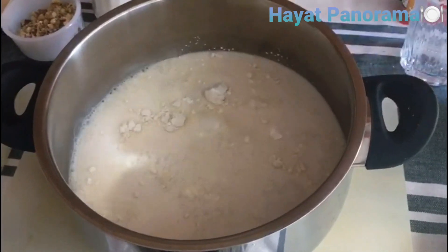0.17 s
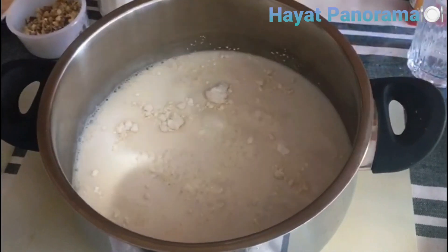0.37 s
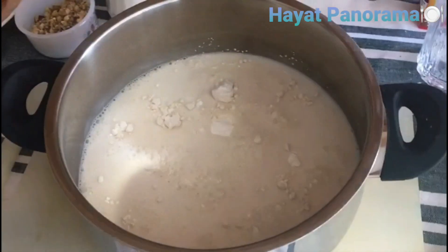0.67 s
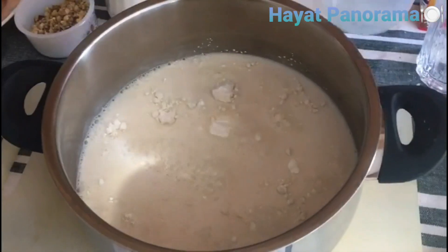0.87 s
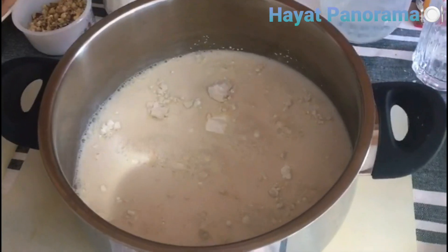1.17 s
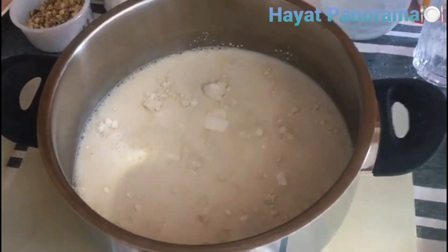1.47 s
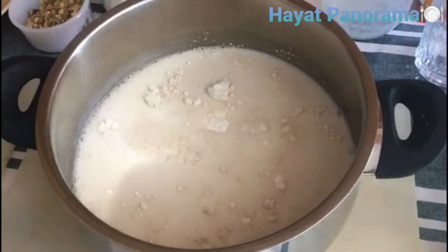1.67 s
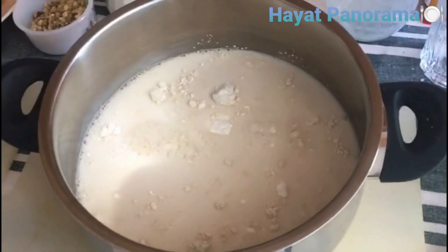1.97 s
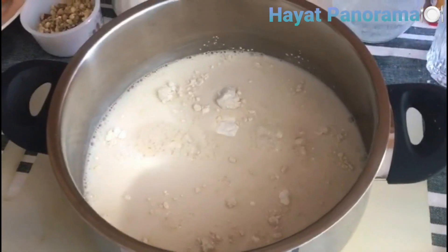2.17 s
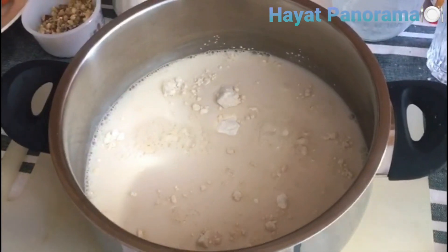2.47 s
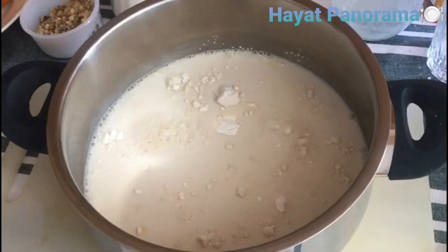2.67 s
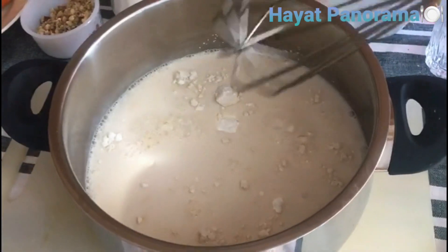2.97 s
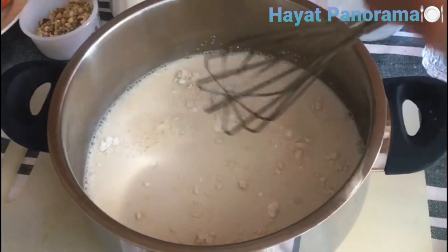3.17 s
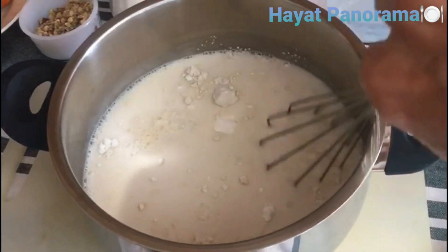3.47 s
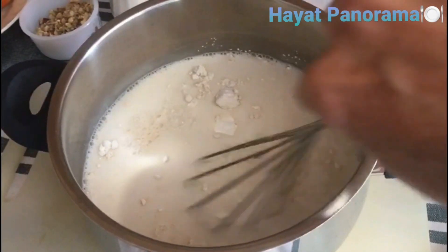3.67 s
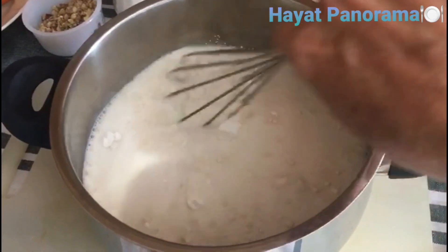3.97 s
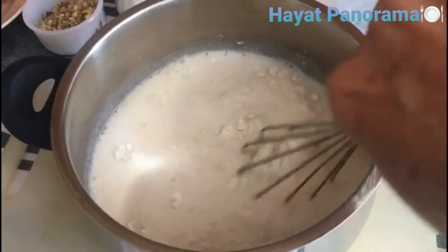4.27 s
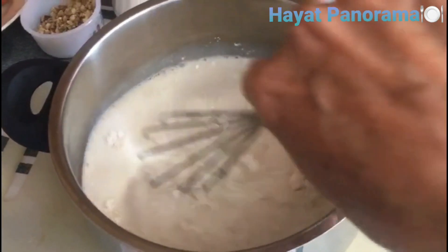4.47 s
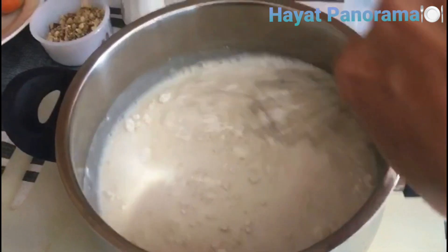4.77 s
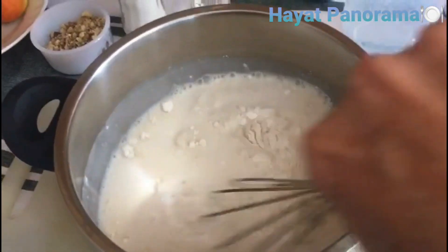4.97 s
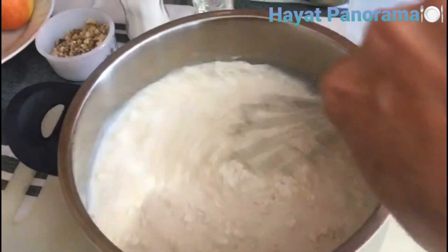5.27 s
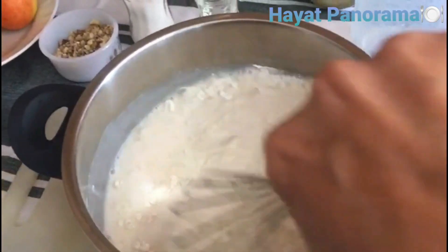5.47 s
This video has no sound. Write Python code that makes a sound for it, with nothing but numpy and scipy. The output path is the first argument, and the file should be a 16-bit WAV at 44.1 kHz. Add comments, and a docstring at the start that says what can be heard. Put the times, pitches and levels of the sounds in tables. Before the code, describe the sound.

A heavy clunk on a table, a metal whisk clattering as it is lifted, bird whistles, then wires scraping and pinging in a steel pot of milk.

```python
"""A wire whisk works in a steel pot of milk on a kitchen table, close to the microphones.
Its wires ping the pot wall, then stick and slip over the steel: random contacts drive resonances, and milk churns.
Before that something is set down with a clunk that rings the table, and the whisk is picked up with a clatter.
A bird sings gliding whistles and chips, blurred by scattering; room air, foam fizz and a low mains hum lie under all.
"""
import sys
import numpy as np
from scipy import signal
from scipy.fft import rfft, irfft
from scipy.io import wavfile
from scipy.ndimage import map_coordinates

SR = 44100
rng = np.random.default_rng(int(sys.argv[2]) if len(sys.argv) > 2 else 0)


def waveform_to_disk(signal):
    """Save audio, clipped to [-1, 1], as 16-bit WAV at the path in sys.argv[1]."""
    frames = np.transpose(np.atleast_2d(signal))
    scaled = np.clip(frames, -1, 1) * 32767
    samples = np.round(scaled).astype(np.int16)
    wavfile.write(sys.argv[1], SR, samples)


N = 247842

# colour of the moving milk and of its bubbles [f/Hz, relative level/dB per Hz]
MILK_COLOUR = [(120, -12), (180, 2), (300, -13), (450, -12), (700, 2), (950, -3.5), (1600, -4.5),
               (3000, -21.5)]


def gain_of(db):
    """Decibels to amplitude."""
    return 10 ** (np.asarray(db) / 20)


def evened(x):
    """Scales to rms 1."""
    return x / np.sqrt(np.mean(x ** 2) + 1e-20)


def unit(x):
    """Scales to energy 1."""
    return x / np.linalg.norm(x)


def read(points, hz):
    """Reads a spectrum on a log-frequency axis."""
    f, value = np.transpose(points)
    return np.interp(np.log(hz + 1), np.log(f + 1), value)


def add(mix, s, sound):
    """Mixes a sound in at time s."""
    part = mix[round(s * SR):][:len(sound)]
    part += sound[:len(part)]


def through(x, response):
    """Passes x through an impulse response."""
    return signal.oaconvolve(x, response)[:len(x)]


def colour(points, size=4096):
    """Causal (minimum-phase) impulse response of energy 1 with the given spectrum."""
    hz = abs(np.fft.fftfreq(size, 1 / SR))
    log_gain = np.log(gain_of(read(points, hz)))
    response = np.fft.ifft(np.exp(np.conj(signal.hilbert(log_gain)))).real
    return unit(response[:size // 2])


def ring(modes):
    """Dying sines of a struck body; neighbouring modes start in opposite directions."""
    t = np.arange(SR) / SR
    out = np.zeros(SR)
    for k, (hz, db, t60) in enumerate(modes):
        out += (-1) ** k * gain_of(db - 60 * t / t60) * np.sin(2 * np.pi * hz * t)
    return out


def body_of(spectrum, modes, ring_db):
    """Response of a struck thing: a broad colour and its ringing modes, ring_db louder than the colour."""
    out = gain_of(ring_db) * unit(ring(modes))
    add(out, 0, colour(spectrum))
    return unit(out)


def flutter(rate_hz, size=4096):
    """Smooth random motion of rms 1, mostly slower than rate_hz."""
    hz = np.fft.rfftfreq(size, N / SR / size)
    slow = irfft(rfft(rng.standard_normal(size)) / (1 + (hz / rate_hz) ** 4))
    return np.interp(np.linspace(0, size - 1, N), np.arange(size), evened(slow))


def slips(per_s, spread_db):
    """Random tiny contacts of uneven size and random direction."""
    out = np.zeros(N)
    at = np.flatnonzero(rng.random(N) < per_s / SR)
    size = np.minimum(rng.exponential(1, N)[at], 4)
    sign = rng.integers(0, 2, N)[at] * 2 - 1
    out[at] = sign * gain_of(spread_db * size)
    return evened(out)


def blows(rows, chatter, spread_db=2.5):
    """Each blow is one sharp contact and a dying chatter of smaller, uneven ones."""
    out = np.zeros(N)
    t = np.arange(SR // 3) / SR
    grains = slips(9000, spread_db)
    for s, db, t60 in rows:
        fade = gain_of(-60 * t / t60)
        rattling = unit(fade * np.roll(grains, -round(s * SR))[:len(t)])
        force = chatter * rattling + (t == 0)
        add(out, s, gain_of(db) * np.linalg.norm(fade) * unit(force))
    return out


def resonate(x, hz, width):
    """A steep resonance whose pitch follows the curve hz."""
    angle = (2 * np.pi * (np.cumsum(hz / SR) % 1)).astype(np.float32)
    turn = np.array([np.cos(angle), np.sin(angle)])
    r = np.exp(-np.pi * width / SR)
    # shift the pitch down to zero, smooth twice, shift back up
    smooth = signal.lfilter([1], [1, -2 * r, r * r], x * turn + 1e-18)
    return evened((turn * smooth).sum(0))


def kitchen(x, wet_db, side=0.038):
    """Sparse reflections die band by band; the two close microphones hear nearly the same."""
    # reverberation of the kitchen [f/Hz, t60/s]
    decay = [(150, 0.5), (600, 0.51), (2000, 0.52), (6000, 0.33), (12000, 0.4)]
    taps = rng.choice([-1., 1.], (2, SR // 3)) * (rng.random((2, SR // 3)) < 3000 / SR)
    taps[:, :SR // 250] = 0  # nothing returns in the first 4 ms
    hz, t, z = signal.stft(taps, SR, nperseg=256)
    fade = gain_of(-60 * t / read(decay, hz)[:, None])
    tails = signal.istft(z * fade, SR, nperseg=256)[1]
    mid, wide = (gain_of(wet_db) * through(x, unit(tail)) for tail in tails)
    return np.array([x + mid + side * wide, x + mid - side * wide])


def background():
    """Still room air as shaped noise, a hum of sines wavering in phase, and fizzing foam."""
    # room air [f/Hz, relative level/dB per Hz]
    air_colour = [(15, -32), (25, -8.5), (74, -0.5), (104, -3.5), (124, -1), (197, -8), (269, -9),
                  (298, -6.5), (331, -13.5), (386, -12.5), (418, -20), (615, -19.5), (817, -23),
                  (1300, -25.5), (12000, -36.5), (15600, -71), (22000, -120)]
    # appliance hum [f/Hz, rms level/dB]
    hum_tones = [(49, -58), (100, -58), (199.5, -64.5), (299.5, -61), (389, -72.5)]
    t = np.arange(N) / SR
    spectrum = gain_of(read(air_colour, np.fft.rfftfreq(N, 1 / SR)))
    air = evened(irfft(rfft(rng.standard_normal(N)) * spectrum, N))
    hum = np.zeros(N)
    for hz, db in hum_tones:
        hum += gain_of(db) * np.sqrt(2) * np.sin(2 * np.pi * hz * t + 0.48 * flutter(2.1))
    # foam popping on the milk
    fizz = sum(resonate(slips(45, 2.56), np.full(N, hz), 2600) for hz in (2990, 6140, 7570, 10200))
    return gain_of(-55.5) * air + hum + gain_of(-79) * kitchen(fizz, wet_db=-0.5)


def clunk():
    """A soft heavy blow rings the modes of the table, with a dull thud of two contacts."""
    # the table under a set-down load [f/Hz, relative level/dB, t60/s]
    table_modes = [(96.4, -29.5, 0.2), (142, -30, 0.048), (220, -17.5, 0.6), (258, -20, 0.063),
                   (296, -33.5, 0.26), (381.5, -27, .1), (426.4, -28, 0.2), (462, -27, 0.16),
                   (470, -18.5, 0.023), (689, -33, 0.17), (636, -32, 0.11), (726, -38, 0.19),
                   (1018, -25.5, 0.2), (1110, -40, .15), (1380, -48, .1), (2665, -45.5, 0.11)]
    # the thud of the load [f/Hz, relative level/dB per Hz]
    thud_colour = [(35, -34), (60, -10), (149, -11.5), (227, -12), (284, -4), (500, -10), (640, -8.5),
                   (945, -17), (1040, -18), (1160, -16), (5000, -65.5), (6500, -94), (11000, -120)]
    clunk_s = 1.178
    ringing = np.zeros(N)
    soft_ring = through(ring(table_modes), signal.windows.hann(9) / 4)  # a soft contact dulls the ring
    add(ringing, clunk_s, gain_of(-2.0) * soft_ring)
    contacts = [(clunk_s, -23, .02), (clunk_s + 0.0036, -30, .13)]  # t/s, level/dB, t60/s
    thud = through(blows(contacts, chatter=3.6), colour(thud_colour))
    return kitchen(ringing, wet_db=-28) + kitchen(thud, wet_db=-7.0)


def note(length, db, first_hz, middle_hz, last_hz, rasp):
    """One note whose pitch follows a parabola; rasp makes its level pulse and its pitch wobble."""
    rasp_hz, rasp_bend = 170.5, 0.092  # bend as a share of the pitch, at full rasp
    u = np.linspace(0, 1, round(length * SR))
    bow = (middle_hz - (first_hz + last_hz) / 2) * (1 - (2 * u - 1) ** 2)
    hz = first_hz + (last_hz - first_hz) * u + bow
    pulse = rasp * np.sin(2 * np.pi * rasp_hz * length * u)
    tone = (1 + pulse) * np.sin(2 * np.pi * np.cumsum(hz * (1 + rasp_bend * pulse)) / SR)
    taper = signal.windows.tukey(len(u), 0.34)  # share of the note spent swelling and fading
    return gain_of(db) * taper * evened(tone)


def bird():
    """Gliding whistles and chips, blurred by scattering from nearby walls."""
    # notes bending through three pitches; t counts from each entry of the phrase
    # [t/s, length/s, level/dB, first f/Hz, middle f/Hz, last f/Hz, rasp 0-1]
    opening = [(1.46, .06, -75, 4250, 4100, 3750, 0), (1.585, .125, -75, 3280, 3790, 3300, 0),
               (1.73, 0.12, -74, 3350, 3790, 3400, 0), (1.997, .025, -64, 3400, 2780, 2450, 0),
               (2.003, 0.022, -63.5, 5800, 5100, 4700, 0), (2.02, .07, -75, 3200, 3550, 3900, 0),
               (2.145, .035, -61, 2120, 2800, 3820, 0.7), (2.192, 0.034, -60.5, 2200, 2950, 4150, .8),
               (2.242, 0.042, -59, 2150, 3000, 4060, .8), (2.33, 0.043, -37.5, 2910, 2820, 2920, .2),
               (2.372, .22, -42.5, 2985, 3443, 2807, 0.01), (2.77, 0.022, -46, 5000, 5730, 6900, 0.04),
               (2.782, 0.027, -45.5, 3960, 4740, 4800, 0.14), (2.811, 0.02, -42, 7650, 5300, 3970, 0.07)]
    slur = [(0, .02, -51.5, 2035, 1996, 2000, 0.8), (.015, 0.0403, -43.5, 1980, 2060, 2340, .05),
            (.046, .029, -45.5, 2330, 2280, 1520, .05)]  # a raspy low slur, sung twice
    chips = [(0, 0.0216, -42, 3070, 4284, 4220, 0.06), (.027, 0.0228, -41, 3475, 4087, 4250, 0.2),
             (.056, .024, -42, 3470, 4050, 4200, .15)]  # three quick chips that answer each slur
    flick = [(0, .014, -45, 3660, 2467, 1920, .1), (.019, .036, -43, 1945, 2600, 2490, 0.03)]  # a closing down-up flick, sung twice
    # when each phrase enters [t/s]
    slur_entries = [2.878, 3.156]
    chip_entries = [3.011, 3.28]
    flick_entries = [3.424, 3.509]
    song = np.zeros(N)
    phrases = ((opening, [0]), (slur, slur_entries), (chips, chip_entries), (flick, flick_entries))
    for notes, entries in phrases:
        for entry in entries:
            for s, *shape in notes:
                add(song, entry + s, note(*shape))
    t = np.arange(SR // 5) / SR
    # the scatter swells and dies within a few tens of ms
    scatter = unit(rng.standard_normal(len(t)) * t * np.exp(-t / 0.0082))
    blurred = song + gain_of(-6) * through(song, scatter)
    return kitchen(blurred, wet_db=-15.5, side=0.38) * gain_of([[-.3], [.3]])  # slightly to the right


def clatter():
    """The whisk drags and jolts as it is lifted, and its wires ring."""
    # jolts of the whisk being picked up [t/s, level/dB, t60/s]
    jolts = [(1.823, -50.5, 0.053), (2.293, -32, 0.041), (2.3, -32, 0.28), (2.334, -35, 0.081),
             (2.346, -35.5, 0.055), (2.366, -34.5, 0.14), (2.39, -36.5, 0.11), (2.402, -42, 0.027)]
    # colour of the whisk [f/Hz, relative level/dB per Hz]
    whisk_colour = [(150, -1.5), (260, 0), (540, 2.5), (800, -7), (1150, 3.5), (1600, -3), (2400, -6),
                    (2900, 2.5), (3600, -9.5), (4200, -3), (4900, -14.5), (5700, -2.5), (6500, -16),
                    (9500, -6.5), (12000, -13)]
    # its loose wires [f/Hz, relative level/dB, t60/s]
    loose_wires = [(470, -26, .12), (544, -2, 0.12), (1068, 1.5, 0.076), (1180, -18, 0.082),
                   (2256, -4, 0.25), (2950, -3, 0.18), (3250, -19, .1), (4190, -4, 0.15),
                   (5630, -16, 0.085), (5770, 0, 0.087), (7870, -4, 0.08), (9600, -13, 0.06)]
    body = body_of(whisk_colour, loose_wires, ring_db=-9)
    return kitchen(through(blows(jolts, chatter=17), body), wet_db=-10.0)


def knocks():
    """Blunt bumps of cookware that ring the base of the pot."""
    # dull knocks [t/s, level/dB, t60/s]
    bumps = [(2.084, -41.5, 0.08), (3.54, -40, 0.024), (3.595, -53, 0.06), (3.888, -46.5, 0.25),
             (4.816, -36, 0.15), (4.828, -40, 0.037), (5.032, -48, .06), (5.16, -47, 0.051)]
    # their colour [f/Hz, relative level/dB per Hz]
    bump_colour = [(90, -23), (200, 4), (450, 3.5), (800, -10), (1250, -3), (1900, -14.5), (3000, -14),
                   (3700, -4), (5000, -16), (12000, -29.5)]
    # modes of the pot's base [f/Hz, relative level/dB, t60/s]
    base_modes = [(350.7, 2, 0.37), (417, -0.5, 0.15), (654, 1, 0.17), (937, 3, 0.081), (1230, -6, 0.3),
                  (2190, -2.5, 0.094), (3500, 8.5, 0.013)]
    body = body_of(bump_colour, base_modes, ring_db=0.5)
    return kitchen(through(blows(bumps, chatter=11.0), body), wet_db=-12)


def ticks():
    """Each strike pings the wall, which the milk damps quickly; then the wires rattle against each other."""
    # wires striking the pot wall [t/s, strike peak level/dB, rattle level/dB, rattle t60/s]
    strikes = [(3.536, -6.5, -30, 0.054), (3.5382, -21, -24, 0.04), (3.595, -32, -34, 0.14),
               (3.779, -45, -45.5, 0.035), (3.8904, -35, -36.5, .07), (3.904, -39, -45, 0.081),
               (4.565, -43, -48, 0.08), (4.6233, -32, -45, 0.026), (5.0314, -19.5, -34.5, 0.076),
               (5.058, -25, -42, 0.13), (5.075, -26.5, -43, 0.051), (5.238, -38, -52, 0.093)]
    # colour of the rattle [f/Hz, relative level/dB per Hz]
    rattle_colour = [(300, -52), (1000, -7), (1500, -35), (2600, -7), (3600, -9), (4500, -6), (6000, 1),
                     (6700, -0.5), (7600, 5.5), (9000, -10.5), (9600, -4), (12000, -14)]
    # modes of the pot wall [f/Hz, relative level/dB, t60/s]
    wall_modes = [(960, -32, 0.039), (2036, -25.5, 0.14), (2600, -35, .09), (2820, -16.5, 0.072),
                  (4560, -15, 0.074), (5120, -9.5, 0.026), (5520, 0, 0.015), (5990, 2.5, 0.027),
                  (6330, -0.5, 0.0079), (6920, -6, 0.018), (7130, -3, .012), (7620, -1, 0.029),
                  (8050, -16, 0.023), (9550, -13.5, 0.032), (10930, -14, 0.014), (11000, -11, 0.035),
                  (11630, -10.5, 0.032)]
    ping = ring(wall_modes)
    pings = np.zeros(N)
    for s, strike_db, _, _ in strikes:
        add(pings, s, gain_of(strike_db) * ping / abs(ping).max())
    rattles = [(s, db, t60) for s, _, db, t60 in strikes]
    rattle = through(blows(rattles, chatter=15), body_of(rattle_colour, wall_modes, ring_db=-10.5))
    return kitchen(pings, wet_db=-17, side=0.24) + kitchen(rattle, wet_db=-8, side=0.1)


def stroke(start, length, release_t60):
    """Level of one push of the whisk: it bites, presses hardest halfway, and lets go."""
    attack_s, swell_db = 0.014, 2.5
    t = np.arange(N) / SR - start
    bite = np.clip(t / attack_s, 0, 1)
    arch = np.sin(np.pi * np.clip(t / length, 0, 1))
    release_db = -60 * np.maximum(t - length, 0) / release_t60
    return bite * gain_of(swell_db * (arch - 1) + release_db)


def whisk_motion():
    """The strokes set how hard the wires scrape, sing and churn, and where they rub."""
    # strokes of the whisk; lean runs from 0 on the floor of the pot to 1 on its wall
    # [t/s, length/s, scrape level/dB, milk level/dB, lean 0-1]
    strokes = [(3.598, 0.039, -42.5, -68, 0.9), (3.77, 0.11, -47, -60, 0.93),
               (3.877, 0.07, -40, -58.5, 0.99), (3.955, 0.29, -47, -71.5, .05), (4.462, .09, -72, -69, .9),
               (4.528, .125, -55, -60, 1), (4.649, 0.061, -44, -56, 0.8), (4.719, .06, -50, -58.5, 0.8),
               (4.807, 0.018, -41.5, -49, 0.73), (4.865, 0.17, -48, -63.5, 0.14),
               (5.025, 0.045, -50, -58.5, 0.55), (5.126, 0.12, -49, -61.5, 0.82),
               (5.23, .12, -42, -61.5, 0.71), (5.356, 0.09, -48.5, -60.5, 0.83),
               (5.573, 0.066, -49.5, -55.5, 0.74)]
    # a wire catches and squeals [t/s, length/s, level/dB]
    squeals = [(3.975, .04, -52), (4.108, 0.059, -50), (4.611, 0.036, -47.5), (5.027, 0.063, -47.5)]
    release_t60, slosh_t60 = 0.17, 0.29  # s; the milk moves on after the stroke
    sing_floor_db, sing_wall_db = -6.5, -10  # singing of the wires relative to the scrape
    pushes = np.array([gain_of(db) * stroke(s, length, release_t60) for s, length, db, _, _ in strokes]) ** 2
    scrape = np.sqrt(pushes.sum(0))
    # strokes that overlap share the lean by their power
    lean = np.array([row[-1] for row in strokes]) @ pushes / (scrape ** 2 + 1e-20)
    squeal = sum(gain_of(db) * stroke(s, length, release_t60) for s, length, db in squeals)
    singing = scrape * gain_of(sing_floor_db + lean * (sing_wall_db - sing_floor_db))
    sloshes = [gain_of(db) * stroke(s, length, slosh_t60) for s, length, _, db, _ in strokes]
    churn = np.linalg.norm(sloshes, axis=0)
    return scrape, singing, squeal, churn, lean


def rubbed(drive, hz, width, swirl=0.011, patchy_db=2.5):
    """One mode under a moving contact: it swells and fades, and the swirling milk bends its pitch."""
    mode = resonate(drive, hz * (1 + swirl * flutter(5.1)), width)
    return mode * evened(gain_of(patchy_db * flutter(13.8)))


def bubbles(per_s, count=12):
    """Small air pockets ring for a few cycles and rise in pitch."""
    t = np.arange(SR // 25) / SR
    out = np.zeros(N)
    blips = []
    for hz in np.geomspace(280, 1400, count):
        tone = np.exp(-t * hz / 7) * np.sin(2 * np.pi * hz * t * (1 + 3 * t))
        blips.append(gain_of(read(MILK_COLOUR, hz)) * tone)
    kind = rng.integers(0, count, N)
    births = slips(per_s, 3.0)
    for at in np.flatnonzero(births):
        add(out, at / SR, births[at] * blips[kind[at]])
    return evened(out)


def off_the_milk(x, delay_s=0.000604, share=0.57, sway=0.071, slosh_hz=6):
    """The sloshing surface sends back an inverted echo, so notches wander through the sound."""
    late = np.arange(N) - SR * delay_s * (1 + sway * flutter(slosh_hz))
    return evened(x - share * map_coordinates(x, [late], order=3))


def stirring():
    """Wires stick and slip over the steel, sing when pressed, and churn the milk."""
    # the pot under the scraping wires
    # [f/Hz, width/Hz, relative level/dB rubbed on its floor, relative level/dB rubbed on its wall]
    pot_modes = [(940, 170, -14, -17), (1296, 49, -15, -11.5), (1542, 47, 0, -2.5), (1740, 90, 1, -8.5),
                 (2226, 53, -29, -5), (2594, 210, -6.5, -9), (3270, 660, -4, 2), (4370, 370, -22, -5),
                 (5346, 98, 1, -6.5), (5910, 320, -5.5, 1.5), (6530, 150, 2, -4), (7075, 210, 2, 0),
                 (7210, 250, -13, -1), (7950, 290, 0, -16), (8650, 330, -1, -18), (8400, 280, 10, -27),
                 (9210, 87, -18, -1), (9650, 330, 1, -2.5), (10500, 240, -11, -6), (11270, 1400, 2, -2)]
    # the wires' own notes [f/Hz, width/Hz, relative level/dB]
    wire_notes = [(4167, 310, -1.5), (7620, 130, -1.5), (8430, 140, -5.5)]
    scrape, singing, squeal, churn, lean = whisk_motion()
    # wire after wire catches and lets go
    drive = slips(3500, 3.3) * evened(gain_of(1.5 * flutter(36)))
    steel = np.zeros(N)
    for hz, width, floor_db, wall_db in pot_modes:
        steel += gain_of(floor_db + lean * (wall_db - floor_db)) * rubbed(drive, hz, width)
    grit = through(drive, colour([(500, -29), (2000, -24), (7000, 12), (12000, 17)]))
    scraping = off_the_milk(evened(steel) + gain_of(-16.0) * grit)
    wires = [gain_of(db) * rubbed(drive, hz, width, swirl=0.008) for hz, width, db in wire_notes]
    milk = evened(through(slips(500, 2.1), colour(MILK_COLOUR)) + gain_of(1) * bubbles(per_s=85))
    close = scrape * scraping + churn * milk
    close += singing * evened(sum(wires))
    close += squeal * evened(wires[0])  # a squeal is the wires' lowest note alone
    return kitchen(close, wet_db=-18.5, side=0.046)


def scene():
    """All sources in the kitchen."""
    return background() + clunk() + bird() + clatter() + knocks() + ticks() + stirring()


def record(dry):
    """The microphone loses the deepest bass; then the recorder's band limit cuts the top treble."""
    thinned = signal.sosfilt(signal.butter(4, 36, "high", fs=SR, output="sos"), dry)
    band_limit = signal.firwin(301, 12100, window=("kaiser", 8), fs=SR)  # cutoff in Hz
    return signal.oaconvolve(thinned, band_limit[None], "same", axes=1)


dry = scene()
out = record(dry)
waveform_to_disk(out)
```